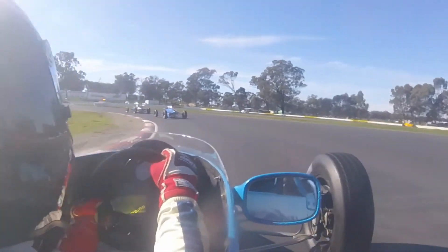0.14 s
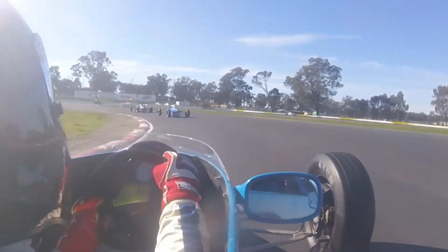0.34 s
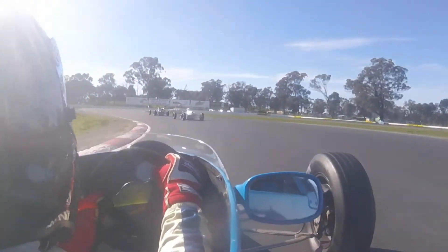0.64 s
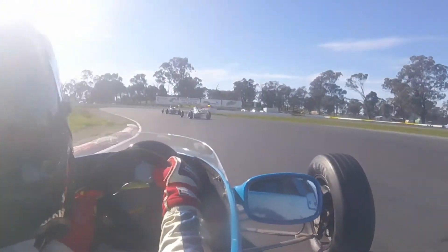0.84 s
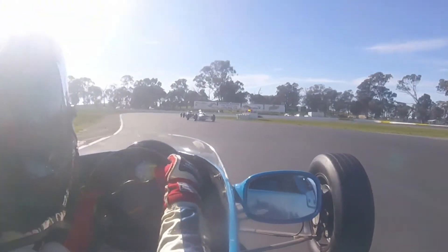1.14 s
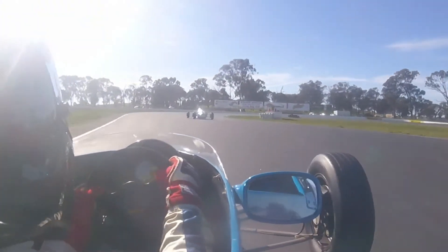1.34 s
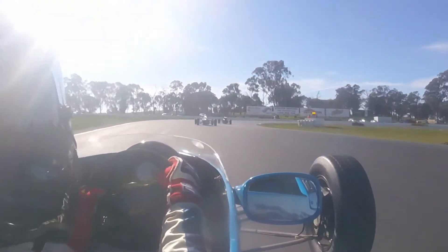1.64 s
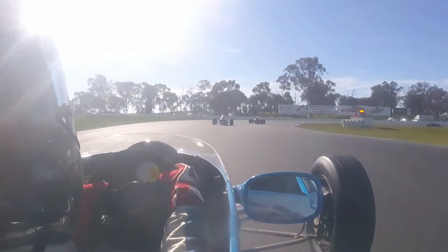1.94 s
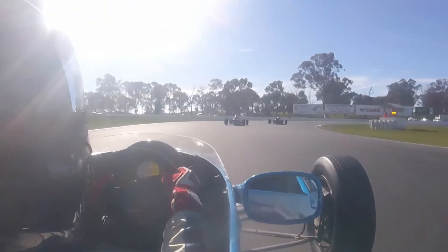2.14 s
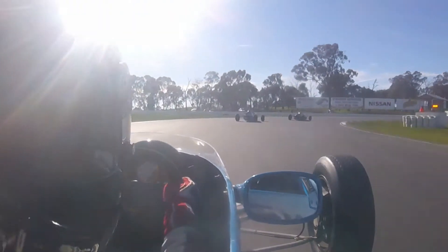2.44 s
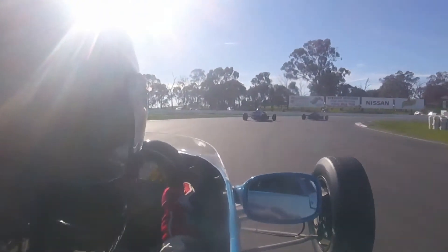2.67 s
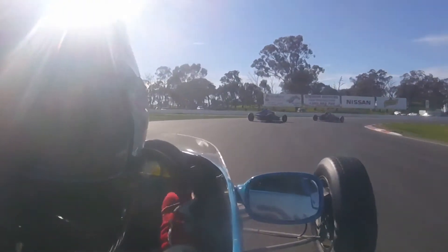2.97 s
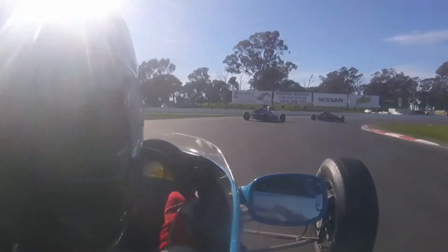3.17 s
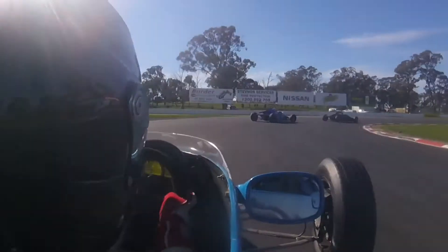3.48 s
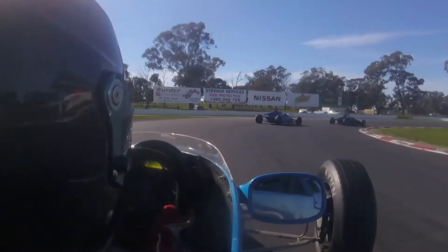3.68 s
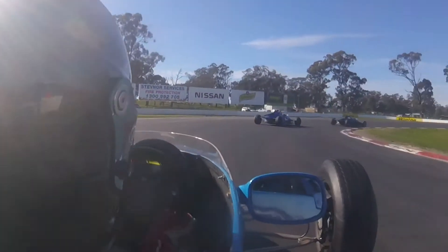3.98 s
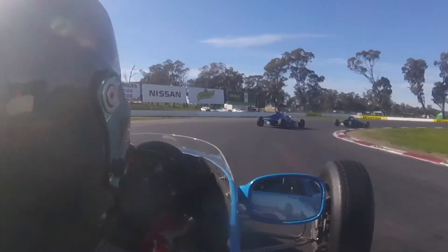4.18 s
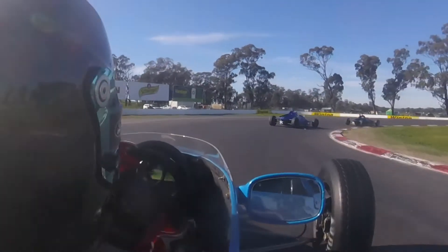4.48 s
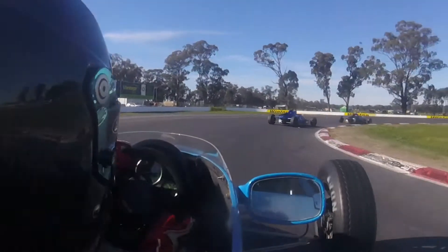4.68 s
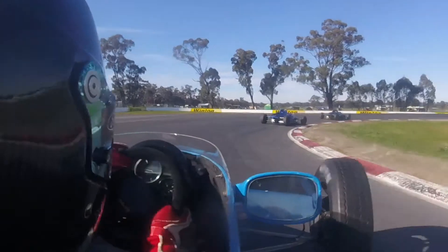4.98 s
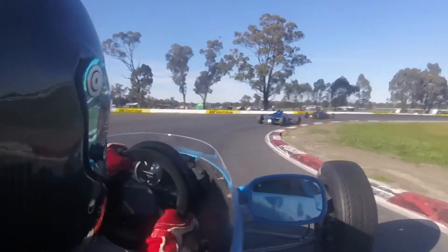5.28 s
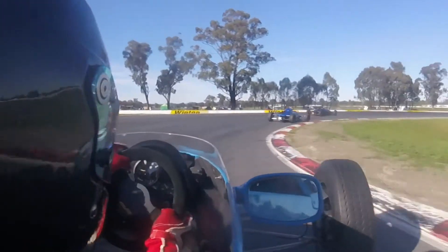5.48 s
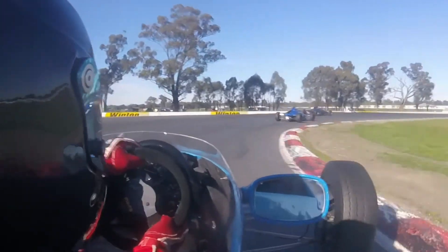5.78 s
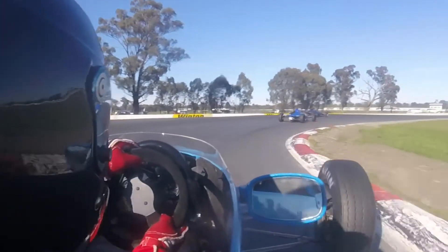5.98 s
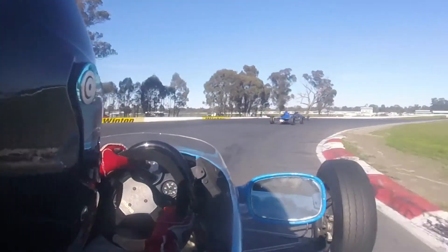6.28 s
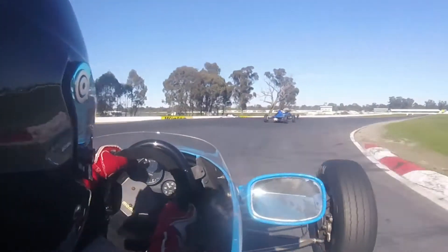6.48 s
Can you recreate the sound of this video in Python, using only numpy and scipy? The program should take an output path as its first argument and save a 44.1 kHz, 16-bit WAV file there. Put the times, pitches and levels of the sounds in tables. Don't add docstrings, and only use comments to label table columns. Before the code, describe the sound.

A small four-cylinder racing engine drones and pulls hard on board, drops off for a bend, then growls back up in pitch over rumbling tyres.

```python
import sys
import numpy as np
from scipy import signal
from scipy.fft import rfft, irfft, next_fast_len
from scipy.io import wavfile
from scipy.ndimage import uniform_filter1d, map_coordinates

SR = 44100
rng = np.random.default_rng(int(sys.argv[2]) if len(sys.argv) > 2 else 0)


def dump(signal):
    limited = np.clip(np.atleast_2d(signal).T, -1, 1)
    pcm = np.round(limited * 32767).astype(np.int16)
    wavfile.write(sys.argv[1], SR, pcm)


def volts_from_decibels(level):
    exponent = np.asarray(level, float) / 20
    return 10 ** exponent


N = 291942


def unit(x):
    return x / np.sqrt(np.mean(x ** 2) + 1e-20)


def along(points, hz):
    f, v = np.transpose(points)
    return np.interp(np.log(hz + 1), np.log(f + 1), v)


def curves(rows):
    s, *cols = np.transpose(rows)
    return [np.interp(np.arange(N) / SR, s, c) for c in cols]


def wobble(rate):
    points = rng.standard_normal(int(N * rate / SR) + 4)
    return map_coordinates(points, [np.arange(N) * rate / SR])


def filtered(x, response):
    m = next_fast_len(N + SR // 2)
    return irfft(rfft(x, m) * response(np.fft.rfftfreq(m, 1 / SR)), m)[..., :N]


def coloured(x, spectrum):
    return unit(filtered(x, lambda hz: volts_from_decibels(along(spectrum, hz))))


def humps(rows, x):
    power = sum(volts_from_decibels(2 * db - 12 * ((x - c) / w) ** 2) for c, w, db in rows)
    return 10 * np.log10(power + 1e-7)


def line(turns, flutter_db, drift):
    size = volts_from_decibels(flutter_db * wobble(14))
    return -np.sqrt(2) * size * np.cos(2 * np.pi * (turns + drift * wobble(20)))


def puffs(turns, depth, scatter_db):
    strength = volts_from_decibels(scatter_db * rng.standard_normal(int(turns[-1]) + 2))
    size = np.interp(turns, np.arange(len(strength)), strength)
    gate = 1 + depth * np.cos(2 * np.pi * turns)
    return size * gate * rng.standard_normal(N)


def controls():
    # time in seconds, firings a second in Hz, throttle from 0 to 1.
    drive = [(0, 161, 0.53), (.75, 167.5, .7), (1.05, 171.4, 0.6), (1.42, 171.1, 0.28), (1.95, 186.2, 1),
             (2.28, 190.8, .85), (2.38, 179, 0.49), (2.52, 179.6, 0.33), (3.12, 148.3, .25),
             (3.47, 134.1, .05), (3.78, 132.9, 0.7), (4.4, 140.9, 0.81), (4.56, 126.6, 0.87),
             (4.69, 129.3, .62), (4.9, 137.3, 1), (5.17, 145.1, 1), (6.2, 158.1, 0.96), (6.62, 168.2, 1)]
    # time in seconds, level of the burning roar in dB.
    load = [(0, -32.5), (.25, -30.5), (1, -29.5), (1.55, -30), (1.8, -30), (2.2, -27.5), (2.5, -32.5),
            (3.1, -32.5), (3.8, -29), (4.15, -26), (4.41, -24.5), (4.5, -28), (4.72, -26), (5, -23),
            (5.5, -24), (6, -29.5), (6.43, -29), (6.62, -27)]
    # start in seconds, step of the roar in dB.
    sudden_steps = [
        (.03, 6),
        (1.04, 4),
        (1.08, -3),
        (1.34, 4),
        (2.381, -13),
        (2.425, 5),
        (2.455, -7),
        (3.6, 3),
        (4.56, 2.5),
    ]
    recover_s = 0.027
    hz, throttle = curves(drive)
    roar_db, = curves(load)
    t = np.arange(N) / SR
    steps_db = sum(db * (t >= s) * np.exp(-np.abs((t - s) / recover_s) ** 2) for s, db in sudden_steps)
    return uniform_filter1d(hz, SR // 20), np.clip(throttle, 0, 1), roar_db, uniform_filter1d(steps_db, 64)


def road():
    # pitch in Hz, level in dB.
    rumble_colour = [(15, -43), (25, -21), (67, -9), (115, -9), (160, -7), (220, -2.5), (330, -12.5),
                     (450, -26), (800, -45.5), (1200, -120)]
    # centre in Hz, width in Hz.
    frame_mode = (195, 23)
    rumble_mean_db, follows_roar, boom_db = -22, 0.88, -30
    roar_db = controls()[2]
    rumble_db = rumble_mean_db + follows_roar * (roar_db - roar_db.mean())
    rumble = coloured(rng.standard_normal(N), rumble_colour)
    c, w = frame_mode
    boom = filtered(rng.standard_normal(N), lambda f: (f * w / (c * c - f * f + 1j * f * w)) ** 2)
    return volts_from_decibels(rumble_db + wobble(6.6)) * rumble + volts_from_decibels(boom_db) * unit(boom)


def stones():
    # time in seconds, peak in dB.
    hits = [(0.1184, -28.5), (0.5874, -28.5), (1.038, -23), (1.0645, -32.5), (1.3494, -41.5),
            (2.355, -25.5), (2.368, -35), (2.3776, -21.5), (2.4254, -30), (2.4377, -31), (4.29, -29.5),
            (4.7824, -31), (5.0898, -26), (5.8284, -26.5), (5.9064, -27), (6.1008, -23)]
    # start in seconds, length in seconds, level in dB.
    scuff = (3.82, 0.057, -46.5)
    x, t = np.zeros(N + 200), np.arange(200) / SR
    for s, db in hits:
        fade_db = -60 * t / 0.0029
        x[round(s * SR):][:200] += volts_from_decibels(db - 1.5 + fade_db) * rng.standard_normal(200)
    ticks = filtered(x[:N], lambda f: (0.74 + 1800 / (f + 800)) / (1 + (f / 9000) ** 6))
    s, length, db = scuff
    swell = np.exp(-((np.arange(N) / SR - s - length / 2) / (length / 2)) ** 2)
    grit = coloured(rng.standard_normal(N), [(4500, -62.5), (6000, 7), (8000, -6), (8600, -55)])
    return ticks + volts_from_decibels(db + 4 * wobble(90)) * swell * grit


def gears():
    # centre in seconds, half length in seconds, level in dB.
    sings = [
        (1, .08, -53),
        (1.8, .4, -55),
        (2.2, .08, -45),
        (4.3, .12, -50),
        (4.6, .05, -44.5),
        (5.15, .07, -44.5),
        (5.45, .3, -45.5),
        (5.95, .2, -54),
        (6.34, .1, -44.5),
    ]
    teeth = 18
    turns = teeth * np.cumsum(controls()[0]) / SR
    db = humps(sings, np.arange(N) / SR)
    tone = line(turns, flutter_db=1.6, drift=.04)
    upper = line(3 / 2 * turns, flutter_db=4.5, drift=.03)
    return volts_from_decibels(db + 0.5) * tone + volts_from_decibels(.5 * db - 37.5) * upper


def pops():
    # time in seconds, peak in dB.
    snaps = [(0.174, -26), (0.488, -10), (0.532, -5.5), (0.727, -13.5), (1.009, -11), (1.427, -17),
             (2.726, -11.5), (2.83, -23), (2.953, -21), (3.154, -18), (3.192, -11.5), (3.279, -25.5),
             (3.309, -21), (3.456, -12), (3.587, -17), (3.637, -12), (3.681, -22), (4.374, -8.5),
             (5.322, -9.5), (5.582, -11), (6.01, -23), (6.492, -13)]
    x, t = np.zeros(N + 400), np.arange(400) / SR
    for s, db in snaps:
        pitch_hz = 800 * np.exp(0.11 * rng.standard_normal())
        fade_db = -60 * t / 0.0063
        x[round(s * SR):][:400] -= volts_from_decibels(db + 1.0 + fade_db) * np.sin(2 * np.pi * pitch_hz * t)
    return filtered(x[:N], lambda f: 1 / (1 + 1j * f / 3500) ** 2)


def crackle(turns, share):
    at = np.flatnonzero(np.diff(np.floor(2 * turns)))
    draw = rng.random((len(at), 3))
    cracks = draw[:, 0] < share
    sign = np.sign(draw[:, 1] - .5)
    x = np.zeros(N)
    x[at] = cracks * sign * (0.21 + draw[:, 2])
    return x


def burning(turns):
    # pitch in Hz, level in dB.
    roar_colour = [(150, -62), (300, -3.5), (480, 2.5), (680, -2.5), (1000, -7), (1470, -21), (2200, -23.5),
                   (3500, -45), (5000, -120)]
    crack_colour = [(150, -60), (300, -8.5), (600, -3.5), (1000, -4), (2000, -13), (3500, -34.5),
                    (6000, -120)]
    housing_colour = [(710, -32.5), (1200, -4.5), (1520, -7.5), (2690, -11), (3800, -16.5), (4250, -18),
                      (5370, -12), (6200, -19.5), (6950, -26), (8000, -32), (9040, -36.5), (10500, -46),
                      (12500, -71.5), (15300, -120)]
    hz, _, load_db, steps_db = controls()
    shake = 0.91 * wobble(22)
    roar_db = load_db + steps_db
    clatter_db = load_db - 9.5 + 0.0785 * (hz - 150) + .5 * steps_db
    roar = coloured(puffs(turns, depth=0.2, scatter_db=0.25), roar_colour)
    cracks = coloured(crackle(turns, share=.35), crack_colour)
    clatter = coloured(puffs(turns, depth=0.074, scatter_db=0.92), housing_colour)
    out = volts_from_decibels(roar_db + 1.58 + shake) * roar
    out += volts_from_decibels(roar_db - 12.5) * cracks
    return out + volts_from_decibels(clatter_db + 0.36 * shake) * clatter


def faint_overtones(turns):
    # multiple of the firing rate, level in dB.
    overtones = [(4.5, -47), (5.5, -48.5), (6.5, -55), (7, -49), (8, -48.5), (9, -48)]
    # pitch in Hz, gain in dB.
    pipe = [(300, 2), (480, 0.5), (650, 10.5), (800, -5.5), (1000, 4.5), (1300, -1), (1800, -11)]
    hz, throttle, roar_db, _ = controls()
    out = 0
    for k, db in overtones:
        load_db = .8 * (roar_db + 31) - 3.5 * (1 - throttle)
        gain = volts_from_decibels(db + along(pipe, k * hz) + load_db + 1.5 * wobble(2.5))
        out += gain * line(k * turns, flutter_db=0.0, drift=0.057)
    return out


def jolts():
    # time in seconds, change of the firing tone in dB.
    bumps = [(0.071, 5.5), (0.412, 4.5), (0.588, 4), (1.295, 3.5), (1.387, 5.5), (1.441, -5.5),
             (1.49, -7.5), (1.514, 4), (1.595, 4), (1.676, -4.5), (1.711, 1.5), (1.828, -5.5), (1.987, 2),
             (2.103, 0), (2.129, 3), (2.156, 0), (2.233, 5), (2.275, -3), (2.305, 8.5), (2.331, -3),
             (2.367, 7), (2.436, 5.5), (2.83, 2), (2.9, 1), (5.378, 2), (5.411, 5), (5.434, -1), (5.514, 3),
             (5.657, 3.5)]
    s, db = np.transpose(bumps)
    t = np.arange(0, N, 32) / SR
    change_db = db @ np.exp(-((t - s[:, None]) / 0.009) ** 2)
    return np.interp(np.arange(N) / SR, t, change_db)


def slow_changes(order):
    # centre in seconds, half length in seconds, change of the firing tone in dB, of its octave in dB.
    changes = [
        (1.6, .15, 1, 1.5),
        (2.425, 0.029, 2.5, 3),
        (2.848, 0.27, -0.5, 5),
        (3.299, 0.15, -10, -8),
        (4.089, .05, -5, 7),
        (4.352, 0.078, 6.5, -4.5),
        (4.882, 0.053, -3, 6),
        (6.549, 0.18, -1.5, 0),
    ]
    t = np.arange(N) / SR
    return sum(row[1 + order] * np.exp(-((t - row[0]) / row[1]) ** 2) for row in changes)


def shaft_tones(turns):
    # multiple of the firing rate, level in dB, loss on a closed throttle in dB.
    orders = [(0.5, -0.7, 2.5), (1.0, 1.6, 3), (1.5, -6.5, 9.5), (2.0, 1.05, 13), (2.5, -12.5, 1),
              (3.0, 2.5, 7), (3.5, -5, 13), (4.0, -4.5, 13.5), (5.0, -1, 4.5), (6.0, -2.5, 8.5)]
    # pitch in Hz, half width at -6 dB in Hz, level in dB.
    resonances = [(69.9, 4.5, -23), (81.7, 3, -28.5), (89.6, 3, -25.5), (129.3, 4.5, -19.5),
                  (154.6, 9.5, -11.5), (171.8, 11.5, -9), (193.3, 2.5, -11), (200.6, 21, -13.0),
                  (248, 8.7, -17.5), (294, 25.5, -19), (352.8, 12, -23),
                  (401, 21.7, -30), (484.6, 29.9, -30), (564, 17, -30), (649, 89, -28.5), (747, 6, -30),
                (805, 14, -34), (893, 51, -35), (1016, 77, -32.5), (1120, 33.8, -38)]
    spread_turns = .035
    fall_db = 3
    hz, throttle, _, _ = controls()
    slow, fine = np.arange(0, N, 64), np.arange(N)
    hz_per_s = uniform_filter1d(np.gradient(hz) * SR, SR // 8)
    falling = np.clip(-hz_per_s / 40, 0, 1)
    out = 0
    for k, db, lift_db in orders:
        path_db = np.interp(fine, slow, humps(resonances, k * hz[slow]))
        path_db += db - lift_db * (1 - throttle)
        if k in (1, 2):
            path_db += slow_changes(order=int(k))
        if k == 1:
            out += volts_from_decibels(path_db + jolts()) * line(turns, flutter_db=0.5, drift=0.0058)
        else:
            path_db += (.6 + .35 * k) * wobble(5) - fall_db * falling * (k > 2)
            lagging = k * turns - spread_turns * k * k
            out += volts_from_decibels(path_db) * line(lagging, flutter_db=.8, drift=.004 * k + .004)
    return out


def engine():
    turns = np.cumsum(controls()[0]) / SR
    return shaft_tones(turns) + faint_overtones(turns) + burning(turns)


def scene():
    return (road() + stones() + gears() + pops() + engine())[None]


def roll_off(x):
    return signal.sosfilt(signal.butter(12, 12300, fs=SR, output="sos"), x)


def record(dry):
    soft = dry / (1 + np.abs(dry / 1.02) ** 6) ** (1 / 6)
    mix = filtered(soft, lambda f: 1 / (1 + (f / 11500) ** 8))
    return roll_off(mix)


dry = scene()
out = record(dry)
dump(out)
```